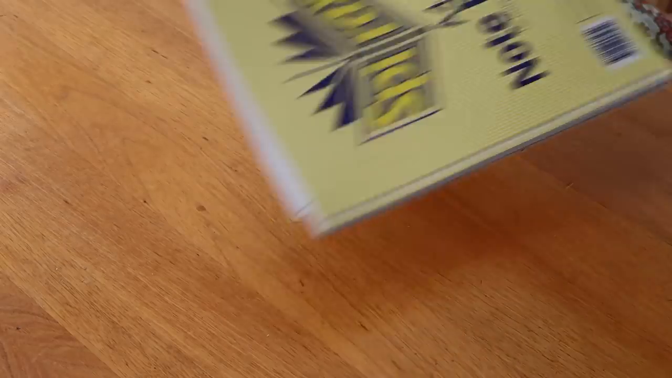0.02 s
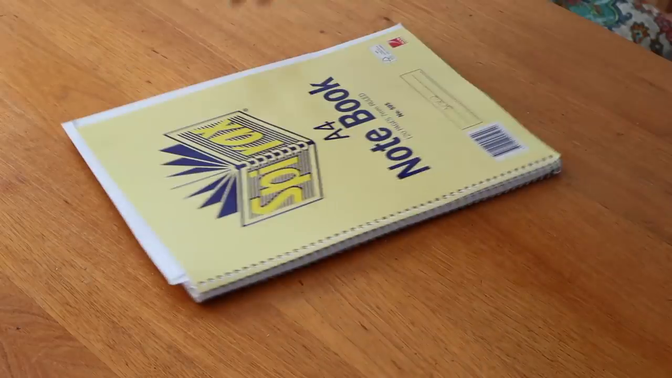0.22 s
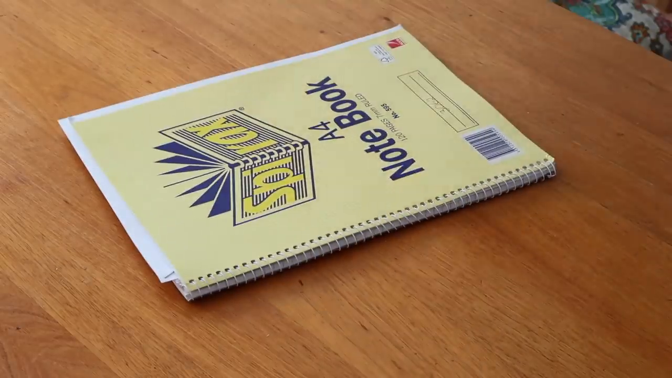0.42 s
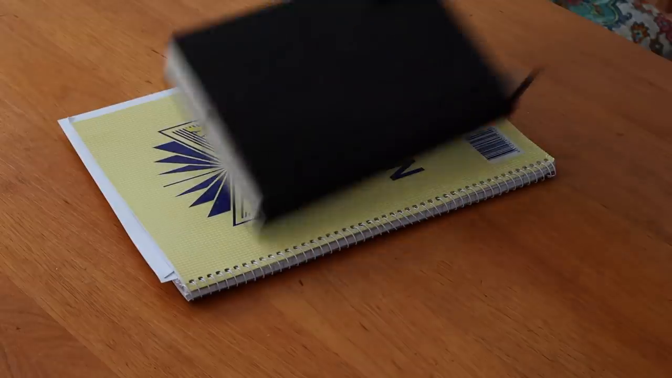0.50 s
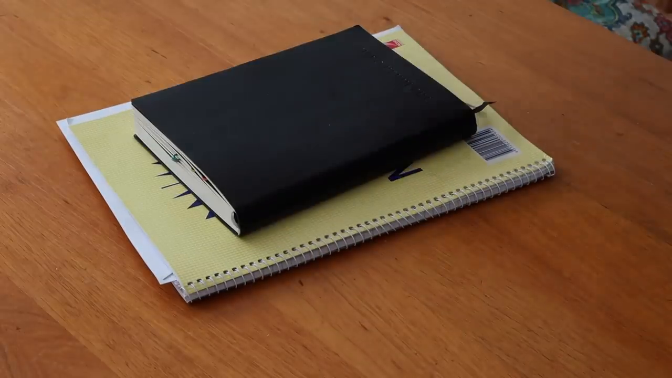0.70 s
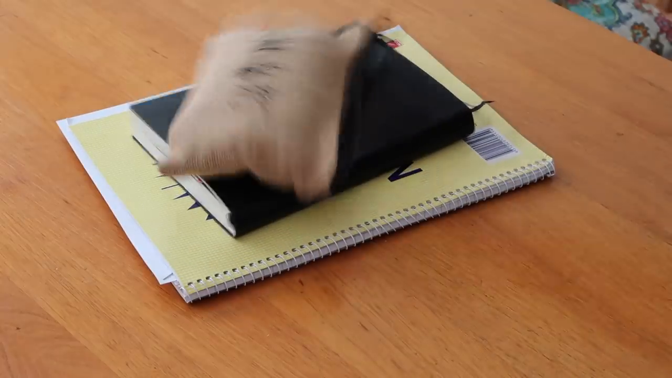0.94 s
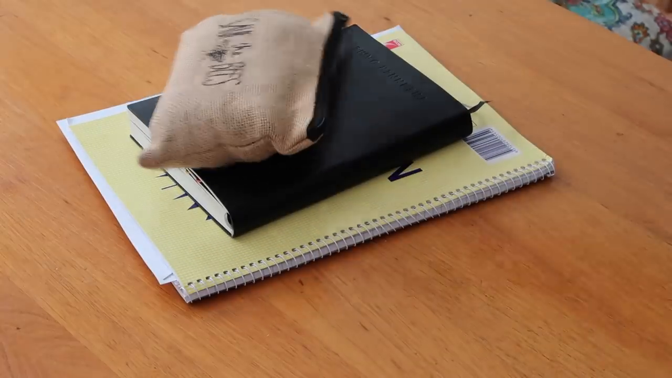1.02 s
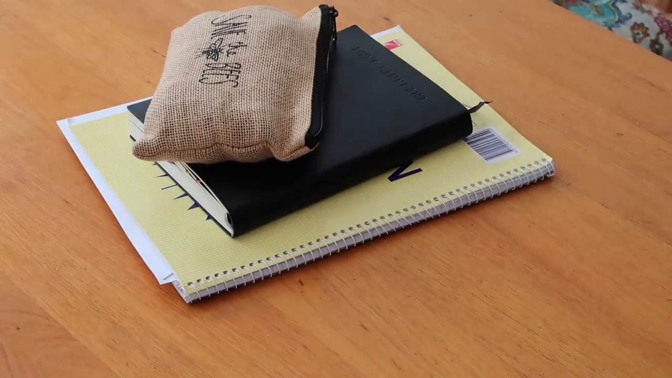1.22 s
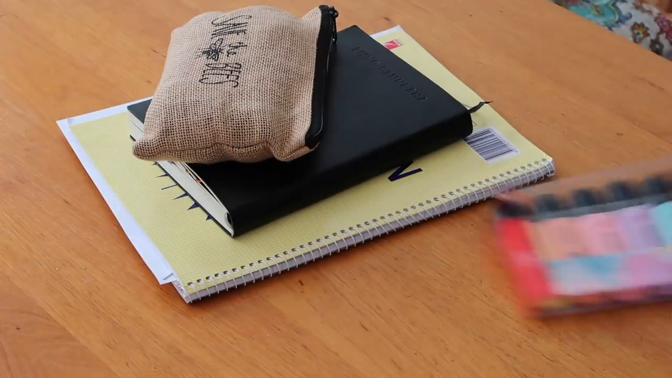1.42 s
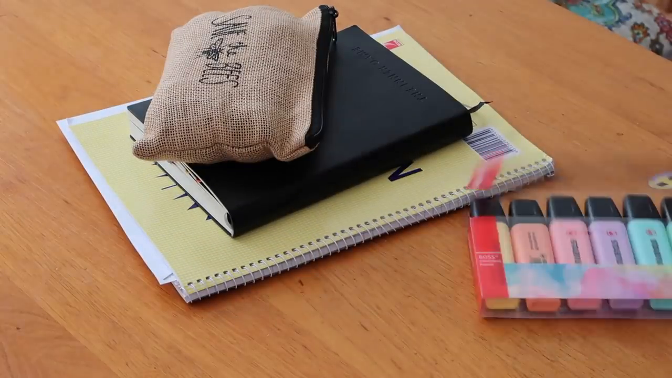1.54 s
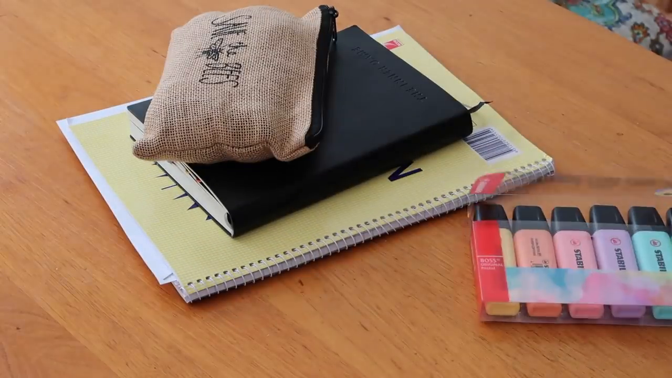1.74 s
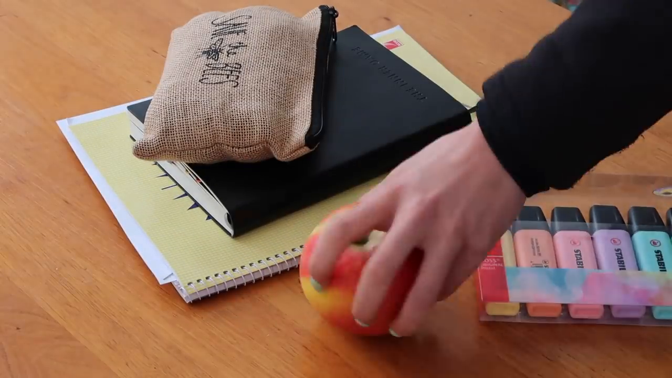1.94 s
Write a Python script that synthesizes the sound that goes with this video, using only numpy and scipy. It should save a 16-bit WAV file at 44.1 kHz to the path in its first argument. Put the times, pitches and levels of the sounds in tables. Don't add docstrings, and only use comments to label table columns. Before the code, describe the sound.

Close stereo pickup in a quiet, bare-walled room: pad edge taps then slaps flat, a notebook thumps with a boom, a cloth pencil case rattles, then plastic markers click and clatter, each echo cut short.

```python
import sys
import numpy as np
from scipy import signal
from scipy.fft import rfft, irfft
from scipy.io import wavfile

SR = 44100
rng = np.random.default_rng(int(sys.argv[2]) if len(sys.argv) > 2 else 0)


def log_audio(samples):
    frames = np.atleast_2d(samples).T
    limited = np.clip(frames, -1, 1)
    pcm = np.round(limited * 32767).astype(np.int16)
    wavfile.write(sys.argv[1], SR, pcm)


def invert_db(x):
    u = np.asarray(x, float) / 20
    return 10 ** u


N = 85995


def evened(x):
    return x / np.sqrt(np.mean(x ** 2) + 1e-20)


def read(points, hz):
    f, value = np.transpose(points)
    return np.interp(np.log(hz + 1), np.log(f + 1), value)


def add(mix, s, sound):
    part = mix[round(s * SR):][:len(sound)]
    part += sound[:len(part)]


def colour(x, points):
    cep = irfft(read(points, np.fft.rfftfreq(4096, 1 / SR)) * np.log(10) / 20)
    cep[1:2048] *= 2
    cep[2049:] = 0
    taps = irfft(np.exp(rfft(cep)))[:2048]
    gain = np.linalg.norm(taps)
    return signal.oaconvolve(x, taps)[:len(x)] / gain, gain


def shape(t, rise, t60):
    rise, t60 = max(rise, 1e-4), max(t60, 1e-3)
    swell = np.sin(np.pi / 2 * np.minimum(t / rise, 1)) ** 2
    return swell * invert_db(-60 * np.maximum(t - rise, 0) / t60)


# [t/s, level/dB, f/Hz, t60/s, rise/s]
KNOCK_HITS = [(.187, -16, 690, 0.004, 0.0016), (0.1985, -17.5, 459, 0.018, 0.002),
              (0.2701, -10.5, 1140, 0.016, 0.0042), (.2763, 1.9, 2280, 0.0043, 0.0016),
              (0.2762, -14, 1570, 0.0074, 0.0026), (0.2778, -12.5, 5370, 0.0045, 0.00063),
              (0.2771, -5, 3100, 0.0029, 0.00095), (.2772, -26, 6550, .003, 0.00048),
              (0.278, -21, 9450, .003, 0.0004), (.2868, -12.5, 1740, 0.013, 0.0013),
              (0.2916, -12, 1570, .006, 0.0009), (0.2961, -12, 1950, 0.014, 0.00045),
              (0.5947, -23, 1510, 0.0053, 0.00049), (0.5973, -10, 890, 0.0029, 0.0011),
              (0.5977, -24, 4400, 0.002, 0.00025), (.606, -13, 460, 0.0083, 0.0009),
              (1.1872, -20.5, 2800, 0.0094, 0.00032), (0.6345, -6.5, 830, 0.0027, 0.0011),
              (.636, -16, 1920, .004, 0.00051), (.9915, -15, 550, 0.016, 0.0016),
              (0.9938, -8.5, 2450, 0.004, 0.00041), (1.0021, -4, 1850, 0.0041, 0.00041),
              (1.0006, -8, 3300, 0.008, 0.0003), (1.009, -5, 9600, 0.0013, 0.00028),
              (1.0074, -12.5, 5200, 0.0028, 0.00027), (1.0104, -3.5, 2370, 0.0076, 0.00077),
              (1.0131, -5, 2630, 0.0044, 0.00039), (1.0168, -2.5, 2720, 0.0033, 0.00044),
              (1.02, -11, 2200, .004, .0004), (1.1795, -19, 2715, .015, 0.00058),
              (1.3882, -6, 1525, 0.011, 0.00053), (1.388, -17, 4700, 0.0028, 0.0002),
              (1.4025, -12.5, 1380, 0.017, 0.00081), (1.4126, -15, 1510, .01, 0.0012),
              (1.5203, -8, 4700, 0.002, 0.0006), (1.5203, -12.5, 5750, 0.0048, 0.00089),
              (1.5205, -28, 11300, 0.0036, 0.00064), (1.522, -11.5, 612, 0.077, 0.0023),
              (1.524, -7.5, 1350, 0.0095, 0.0013), (1.574, -13.5, 2210, 0.018, 0.0014)]


def knocks():
    out, t = np.zeros(N), np.arange(4000) / SR
    for s, db, hz, t60, rise in KNOCK_HITS:
        ring = shape(t, rise, t60) * np.sin(2 * np.pi * hz * t)
        add(out, s, -invert_db(db) * ring)
    return out


# [t/s, level/dB, rise/s, t60/s, tilt/dB per octave]
CLATTER_BURSTS = [(0.173, -31.5, 0.0098, 0.1, -0.5), (.186, -29, 0.014, 0.06, -.5),
                  (0.264, -21.5, 0.012, 0.048, -0.8), (0.594, -19.5, 0.006, 0.076, -0.97),
                  (.602, -28, 0.023, 0.078, 4.5), (.78, -43.5, 0.025, 0.12, -2.5),
                  (.894, -57, 0.0018, 0.11, -1), (0.2748, -24.5, 0.0033, 0.013, 1.5),
                  (0.282, -22.5, 0.0044, 0.093, -0.5), (.609, -34, 0.0079, 0.052, 4),
                  (0.628, -33, 0.0044, 0.024, 6), (.632, -46, 0.0028, 0.021, -9),
                  (0.9899, -22, 0.0074, 0.042, -2.5), (0.997, -16.5, 0.013, 0.093, 0.32),
                  (1.178, -32, 0.006, 0.059, 0.7), (1.3879, -18, 0.0029, 0.1, 0.73),
                  (1.469, -20.5, 0.046, 0.11, 6), (1.5195, -20, 0.0078, 0.059, -1.76),
                  (1.5198, -22, .0008, .012, -5), (1.3875, -28, 0.0006, .01, 8),
                  (1.431, -32, 0.034, 0.19, 0), (1.556, -21.5, 0.014, 0.15, 0.5),
                  (1.717, -37.5, 0.01, 0.61, 2.5)]
GRAINS_PER_S, GRAIN_SPREAD_DB = 6670, 2.5


def clatter():
    out, t = np.zeros(N), np.arange(SR // 2) / SR
    chance = rng.random(N + SR)
    size = invert_db(GRAIN_SPREAD_DB * rng.exponential(1, N + SR))
    sign = rng.standard_normal(N + SR)
    grains = np.clip((GRAINS_PER_S / SR - chance) * 100, 0, 1) * size * sign
    for s, db, rise, t60, tilt_db in CLATTER_BURSTS:
        burst = shape(t, rise, t60) * evened(grains[round(s * SR):][:len(t)])
        tilt = [(125, -3 * tilt_db), (16000, 4 * tilt_db)]
        add(out, s, invert_db(db) * colour(burst, tilt)[0])
    return out


# [f/Hz, level/dB per Hz]
PAD_FACE = [(100, -8.5), (254, -29), (568, -5), (900, -12.5), (1700, -2.5), (2600, -10.5), (7380, -18),
            (15800, -38)]
PAD_RIM = [(100, -5), (250, -20.5), (441, -7.5), (700, -14), (1670, -16.5), (3160, -18.5), (8000, -37.5),
           (16000, -40)]
NOTEBOOK = [(100, -4), (254, -6.5), (906, -10), (1500, -13.5), (3000, -18.5), (4800, -24), (6000, -35.5),
            (16000, -44.5)]
PENCIL_CASE = [(100, -21), (300, -14), (450, -11), (1000, -20), (1900, -8.5), (3300, -10), (9000, -19),
               (14500, -20)]
MARKER_PACK = [(100, -24.5), (700, -10.5), (1100, -13.5), (1600, -8.5), (2400, -13.5), (5490, -33.5),
               (9000, -44.5), (16000, -51.5)]
MARKER_PACK_FLAT = [(100, -24), (330, -18), (520, 0.5), (800, -8), (1300, -10), (2350, -11.5),
                    (7000, -29.5), (16000, -49.5)]
SURFACES = [MARKER_PACK, PAD_RIM, PAD_FACE, NOTEBOOK, PENCIL_CASE, MARKER_PACK, MARKER_PACK_FLAT]
SURFACE_STARTS = [0, .172, .26, .494, .894, 1.334, 1.515]


def object_rattle(grains, a, b):
    surface = np.searchsorted(SURFACE_STARTS, np.arange(N) / SR, "right") - 1
    return sum(colour((grains * (surface == j))[a:b], body)[0] for j, body in enumerate(SURFACES))


# [t/s, push level/dB, push length/s, boom level/dB]
BLOWS = [
    (.188, -29, 0.0033, -35),
    (.27, -17, 0.0012, -34.5),
    (.595, -18, 0.0036, -18),
    (.637, 2, .0022, -13),
    (0.6449, -10, 0.0024, -15),
    (.6478, -5.5, 0.0012, -25),
    (0.99, -32, 0.0019, -24),
    (1.002, -30, 0.0044, -17.5),
    (1.519, -24.5, 0.00344, -31.5),
    (1.559, -43, 0.0044, -25.5),
]
# [f/Hz, level/dB, t60/s]
TABLE_NOTES = [(107.7, -2.5, 0.39), (116.2, -13, 0.33), (130.8, -4.5, 0.24), (228.7, -7, 0.12),
               (286.6, -8, 0.33), (356.7, 5, 0.11), (392, -9, 0.3), (448, 7.5, 0.35), (496, 5.5, 0.072),
               (540, -1, 0.28)]
TABLE_RISE_S = 0.0066
REBOUND, REBOUND_FADE = 0.14, 2.1


def thuds():
    t, puff, boom = np.arange(SR // 2) / SR, np.zeros(N), np.zeros(N)
    top = sum(invert_db(db - 60 * t / t60) * np.sin(2 * np.pi * hz * t) for hz, db, t60 in TABLE_NOTES)
    top = top * (1 - np.exp(-t / TABLE_RISE_S))
    for s, db, length, boom_db in BLOWS:
        u = t[:1500] / max(length, 5e-4)
        push = np.sin(np.pi * u) * np.where(u < 1, 1, REBOUND * np.exp(-(u - 1) / REBOUND_FADE))
        add(puff, s, -invert_db(db) * push)
        press = push * (u < 1)
        add(boom, s, invert_db(boom_db) * signal.oaconvolve(top, press / np.sum(press)))
    return puff, boom


# [t/s, level/dB, brightest f/Hz, t60/s]
PAGE_PUFFS = [
    (.606, -31.5, 4000, 0.22),
    (.634, -25.5, 3100, .05),
    (0.11, -42, 4100, 0.18),
]
# [t/s, level/dB, brightest f/Hz, t60/s]
OLD_ECHOES = [(0.1359, -43, 1980, 1), (0.928, -47.5, 2230, 0.57), (0.9588, -40.5, 3050, 0.59),
              (1.335, -35, 2030, 0.39)]
# [share of the brightest f, level/dB]
HISS_COLOUR = [(.2, -6), (.99, 3.5), (1.4, -8.5), (5, -31.5)]


def linger():
    out, t = np.zeros(N), np.arange(SR // 3) / SR
    hisses = OLD_ECHOES + PAGE_PUFFS
    noises = rng.standard_normal((len(hisses), len(t)))
    for (s, db, hz, t60), noise in zip(hisses, noises):
        spectrum = [(share * hz, gain_db) for share, gain_db in HISS_COLOUR]
        add(out, s, invert_db(db - 60 * t / t60) * colour(noise, spectrum)[0])
    return out


# [f/Hz, t60/s]
ROOM_RING = [(80, 0.053), (210, 0.62), (560, 0.41), (1470, 0.53), (3880, 0.45), (10200, 0.38)]
ROOM_DELAY_S = 0.0014


def tail():
    taps, at = np.zeros(SR), np.arange(0, SR - 20, 20)
    taps[at + rng.integers(0, 20, len(at))] = rng.choice([-1., 1.], len(at))
    hz, t, z = signal.stft(taps, SR, nperseg=256)
    fading = z * invert_db(-60 * t / read(ROOM_RING, hz)[:, None])
    h = signal.istft(fading, SR, nperseg=256)[1][:SR * 3 // 4]
    h = h * np.clip(np.arange(len(h)) / SR / ROOM_DELAY_S - 1, 0, 1)
    return h / np.linalg.norm(h)


PATHS, PATH_S = 4, .004


def room(x, tails):
    turn = np.arange(len(x)) / (SR * PATH_S)
    out = 0
    for k, h in enumerate(tails):
        away = abs((turn - k + PATHS / 2) % PATHS - PATHS / 2)
        share = np.cos(np.pi / 2 * np.minimum(away, 1))
        out = out + signal.oaconvolve(x * share, h)[:len(x)]
    return out


# [f/Hz, level/dB per Hz]
HUSH = [(40, -44), (90, 1.5), (200, -1), (485, -8), (1130, -15.5), (2500, -15), (7000, -31), (16000, -43.5)]
# [f/Hz, side minus mid level/dB]
HUSH_WIDTH = [(60, -36), (150, -16.5), (380, -7), (950, -5), (2380, -6.5), (5980, 1), (13500, 5),
              (15200, -5)]
HUSH_DB = -48
HUM_HZ, HUM_WIDTH_HZ, HUM_STEADY = 49, 16, 3.3


def air():
    mid = invert_db(HUSH_DB) * colour(rng.standard_normal(N), HUSH)[0]
    side, gain = colour(invert_db(HUSH_DB) * colour(rng.standard_normal(N), HUSH)[0], HUSH_WIDTH)
    r = np.exp(-np.pi * HUM_WIDTH_HZ / SR)
    waver = evened(signal.lfilter([1], [1, -2 * r, r * r], rng.standard_normal((2, N))))
    slow = HUM_STEADY + waver.T @ [1, 1j]
    spin = np.exp(2j * np.pi * (HUM_HZ * np.arange(N) / SR + rng.random()))
    return mid, side * gain, evened((slow * spin).real)


VIEW_STARTS = [
    0,
    0.496,
    0.896,
    1.335,
    1.856,
]
# [clatter sent to the room, level/dB]
VIEW_HUSH_DB = [0, 0, 0, 0, 1]
VIEW_HUM_DB = [-46, -47, -48.5, -44, -49]
VIEW_RATTLE_SEND_DB = [-1.15, -7, -0.76, 0.54, 1]
# [f/Hz, level/dB]
WALL_COLOUR = [(100, 3.45), (1000, 0.97), (6000, 0.14), (8500, -5), (10500, -2.5), (16000, -10)]
# [f/Hz, side minus mid level/dB]
STEREO_WIDTH = [(60, -37), (200, -21), (800, -20), (2380, -13.5), (5980, 0.5), (10000, 6), (13500, 5),
                (15200, -3)]
ROOM_DB, RING_SEND_DB, PUSH_SEND_DB = 5, -11, -13.5
DIRECT_SIDE_DB, BOOM_SIDE_DB = -13, -36
LOW_CUT_HZ, PUSH_CUT_HZ = 79, 65


def scene():
    grains, (push, boom), rings = clatter(), thuds(), knocks()
    out = np.zeros((2, N))
    low_cut = signal.butter(N=4, Wn=LOW_CUT_HZ, btype="high", fs=SR, output="sos")
    push_cut = signal.butter(N=2, Wn=PUSH_CUT_HZ, btype="high", fs=SR)
    edges = np.round(np.array(VIEW_STARTS) * SR).astype(int).tolist() + [N]
    mid_tails = [tail() for _ in range(PATHS)]
    side_tails = [tail() for _ in range(PATHS)]
    for k, (a, b) in enumerate(zip(edges, edges[1:])):
        rattle = object_rattle(grains, a, b)
        direct = signal.sosfilt(low_cut, rings[a:b] + rattle) + signal.lfilter(*push_cut, push[a:b])
        send = (invert_db(RING_SEND_DB) * rings + invert_db(PUSH_SEND_DB) * push)[a:b]
        send = send + invert_db(VIEW_RATTLE_SEND_DB[k]) * rattle
        send, wall_gain = colour(send, WALL_COLOUR)
        send = invert_db(ROOM_DB) * signal.sosfilt(low_cut, send * wall_gain)
        hush, hush_side, hum = air()
        side, gain = colour(invert_db(DIRECT_SIDE_DB) * direct + room(send, side_tails), STEREO_WIDTH)
        side = side * gain + invert_db(VIEW_HUSH_DB[k]) * hush_side[a:b]
        mid = direct + boom[a:b] + room(send, mid_tails)
        mid = mid + (invert_db(VIEW_HUSH_DB[k]) * hush + invert_db(VIEW_HUM_DB[k]) * hum)[a:b]
        out[:, a:b] = mid + side, mid - side
    wide, gain = colour(linger(), STEREO_WIDTH)
    return out + linger() + [[1], [-1]] * (gain * wide + invert_db(BOOM_SIDE_DB) * boom)


def low_pass(x):
    return signal.sosfilt(signal.butter(12, 15980, fs=SR, output="sos"), x)


def record(dry):
    band = signal.firwin(511, 15850, window=("kaiser", 9), fs=SR)
    held = signal.oaconvolve(np.clip(dry, -1, 1), band[None], "same")
    return low_pass(np.clip(held, -1, 1))


dry = scene()
out = record(dry)
log_audio(out)
```